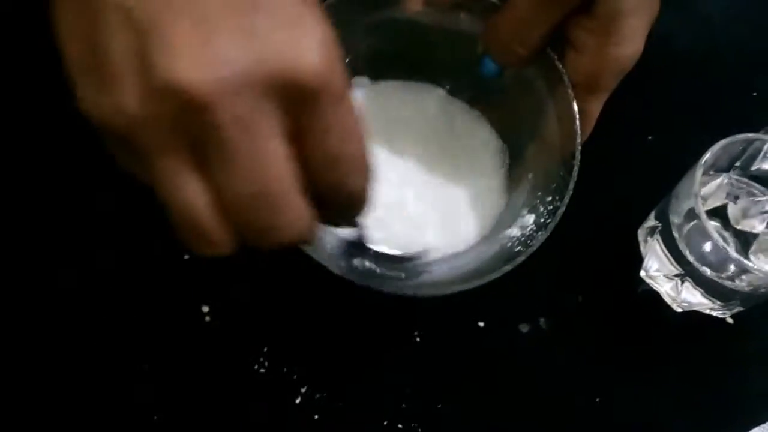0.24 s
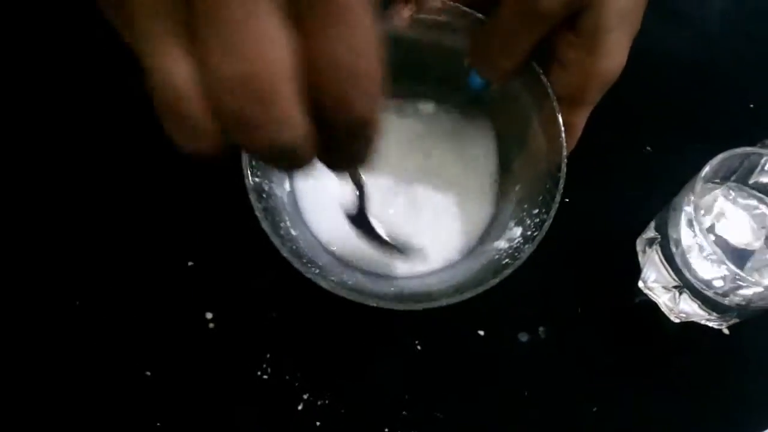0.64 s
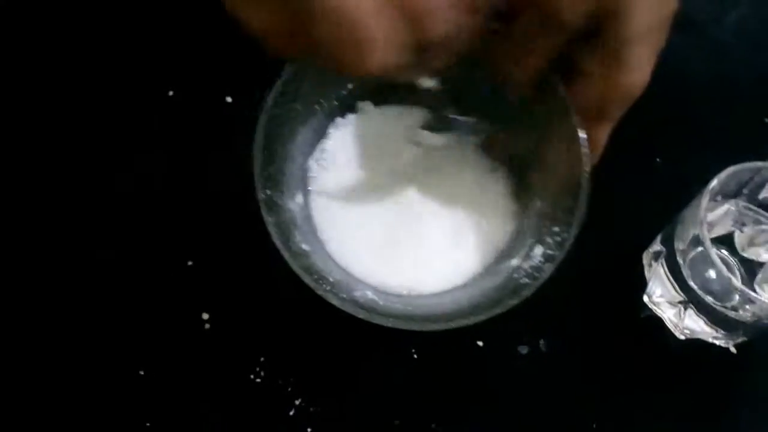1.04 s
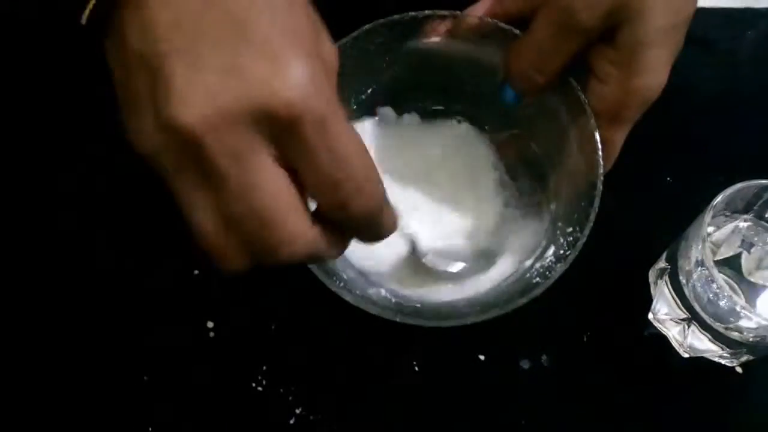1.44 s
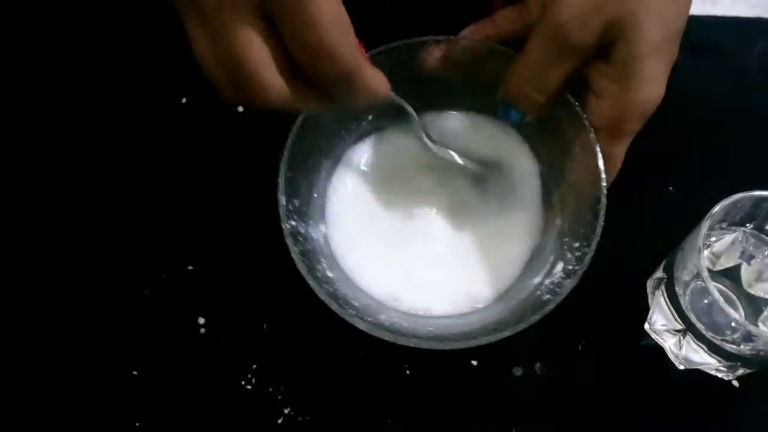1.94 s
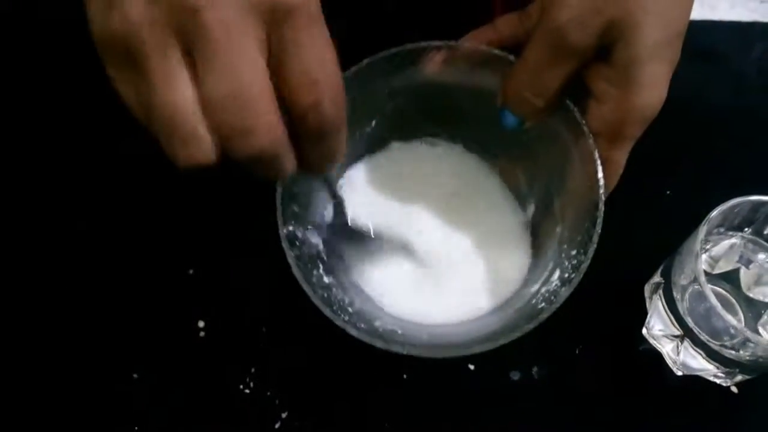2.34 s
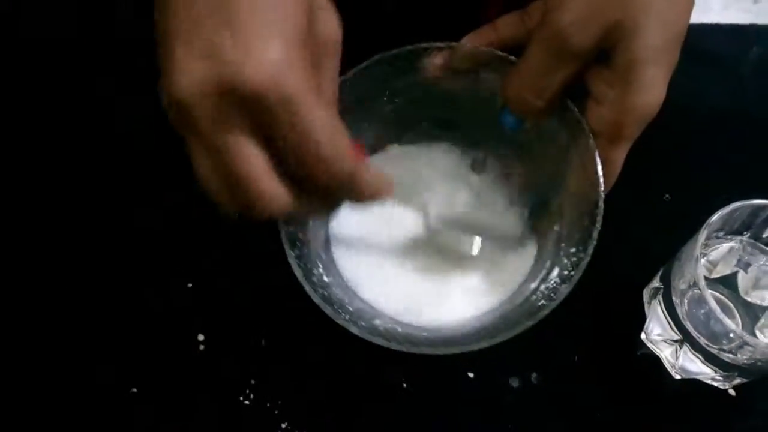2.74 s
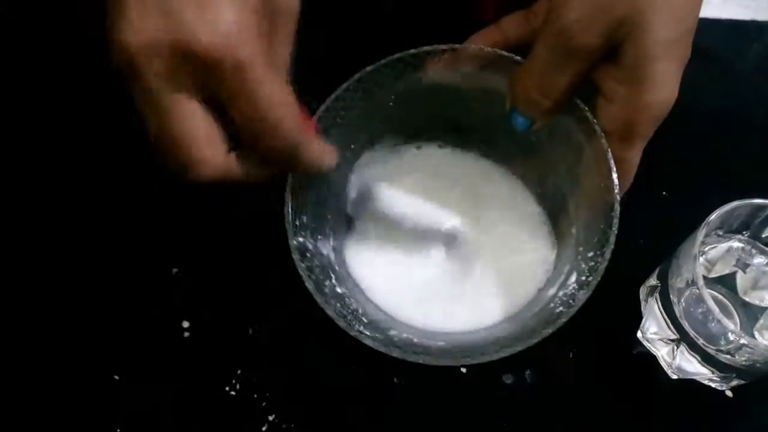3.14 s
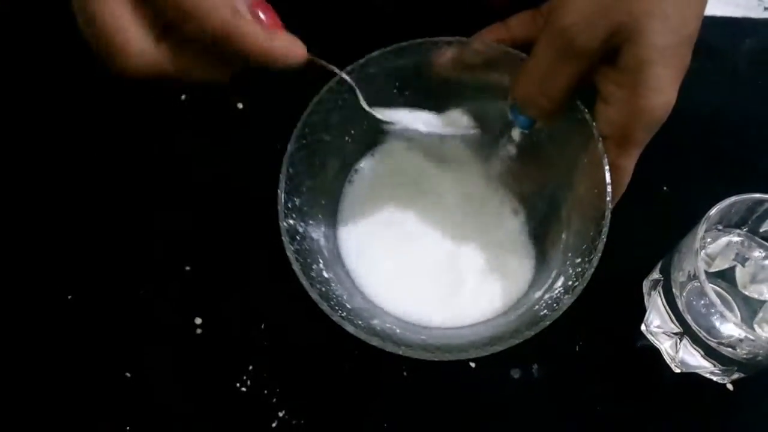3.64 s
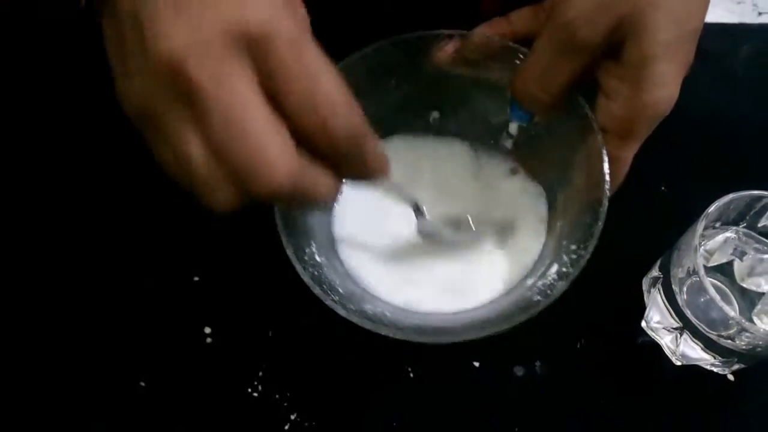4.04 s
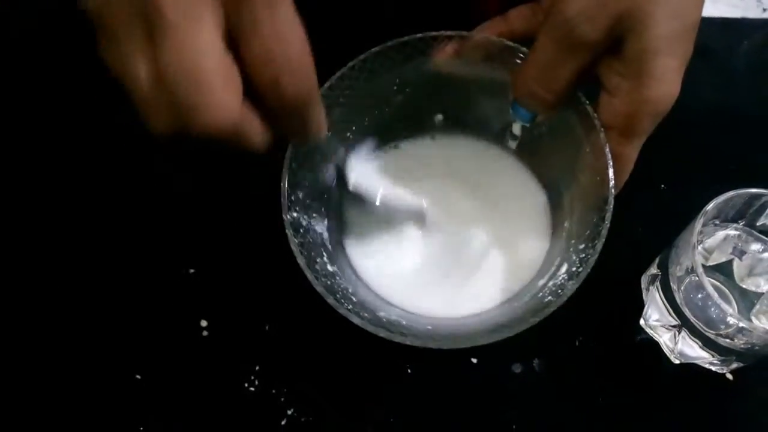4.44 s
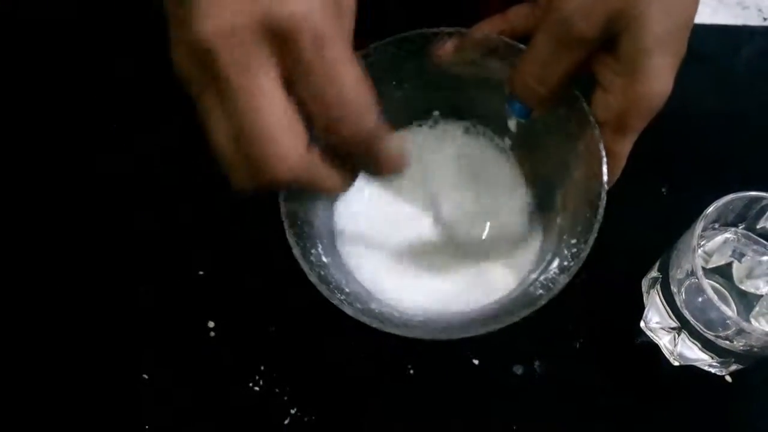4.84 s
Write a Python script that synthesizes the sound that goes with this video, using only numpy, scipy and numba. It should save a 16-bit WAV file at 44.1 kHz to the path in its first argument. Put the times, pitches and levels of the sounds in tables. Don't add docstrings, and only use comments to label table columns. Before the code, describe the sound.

In a small kitchen, a metal spoon stirs thin liquid in a hand-held glass bowl with short, stuttering scrapes and damped knocks. Three hard, bright clinks stand out in the first half. After a small rising squeak and a knock, stirring pauses, tiny drops plink, then scraping resumes. One close microphone, sound leaning right, over a steady fan-like hush.

```python
import sys
import numpy as np
from scipy import signal
from scipy.fft import rfft, irfft, next_fast_len
from scipy.io import wavfile
from numba import njit

SR = 44100
rng = np.random.default_rng(int(sys.argv[2]) if len(sys.argv) > 2 else 0)


def dump_mix(stems):
    frames = np.atleast_2d(stems).T
    limited = np.clip(frames, -1, 1)
    pcm = np.round(limited * 32767).astype(np.int16)
    wavfile.write(sys.argv[1], SR, pcm)


def decibels_to_gain(level_db):
    exponent = np.asarray(level_db, float) / 20
    return 10 ** exponent


N = 224763

# f/Hz, level/dB, t60/s
BASE = [(940, -76, 0.075), (960, -10, 0.034), (1132, -16, 0.028), (1250, -12, 0.035), (593, 2, 0.0059)]
SPOON = [(2740, -15, 0.009), (3330, 5.5, 0.045), (3626, 5, 0.017), (4185, 6.5, 0.011), (4440, -4.5, 0.031),
         (4747, 7, 0.019), (4970, -12, 0.032)]
RIM = [(6490, -9, 0.025), (8070, -22, 0.015), (11800, -33, 0.015)]
WALL = [(1850, -41.5, 0.0074), (2080, -29.5, 0.093), (2380, -26, 0.06), (2544, -24.5, 0.049)]


def rms_one(x):
    return x / np.sqrt(np.mean(x ** 2) + 1e-20)


def at_hz(points, hz):
    points_hz, values = np.transpose(points)
    return np.interp(np.log(hz), np.log(points_hz), values)


def in_time(rows):
    s, *columns = np.transpose(rows)
    return [np.interp(np.arange(N) / SR, s, column) for column in columns]


def drift(rate_hz):
    knots = rng.standard_normal(1200)
    return np.interp(np.arange(N) * rate_hz / SR, np.arange(1200), knots)


def band(x, low_hz, high_hz):
    sos = signal.butter(3, [low_hz, high_hz], "band", fs=SR, output="sos")
    return signal.sosfilt(sos, x)


@njit
def glide(force, turn, r):
    out, state = np.zeros(len(force)), 0j
    for i in range(len(force)):
        state = state * r * turn[i] + force[i]
        out[i] = state.imag
    return out


def ring(force, hz, t60_s):
    turn = np.exp(2j * np.pi * hz / SR) * np.ones(len(force))
    return glide(force, turn, float(decibels_to_gain(-60 / (max(t60_s, 0.002) * SR))))


def scrape():
    # t/s, wall f/Hz, base f/Hz
    contact = [(0.1, 2230, 1090), (0.52, 2240, 1293), (0.8, 2470, 1110), (1.02, 2750, 1100),
               (1.23, 2190, 920), (1.53, 2320, 990), (1.7, 2400, 1100), (1.77, 2080, 1180),
               (1.92, 2340, 1190), (2.22, 2600, 1360), (2.31, 2310, 1350), (2.45, 2380, 1040),
               (2.58, 2680, 1100), (2.95, 2380, 1100), (3.22, 2100, 1225), (4.1, 2250, 1115),
               (4.5, 2210, 1100), (4.85, 2210, 1185)]
    # t/s, level/dB
    rim_song = [(0.81, -58), (0.84, -52), (0.972, -57), (0.994, -48.5), (1.08, -73)]
    # t/s, f/Hz, level/dB
    squeak = [(3.09, 6100, -75), (3.13, 6650, -57), (3.165, 7540, -58), (3.19, 7950, -59),
              (3.24, 8640, -53), (3.27, 8800, -78)]
    spoon_free_hz, spoon_sag_hz_per_db = 4563, 13
    base_db, wall_db, spoon_db = pressure()
    wall_hz, base_hz = in_time(contact)
    spoon_hz = spoon_free_hz - spoon_sag_hz_per_db * np.maximum(spoon_db + 45.5, 0)
    grit_db = -56 + 1.51 * (spoon_db + 29)

    clumps_db = 2.8 * drift(90) + 1.0 * drift(35)
    force = slips(900, spread_db=3.5) * decibels_to_gain(clumps_db)
    wall = rms_one(ring(force, wall_hz, 0.018)) + 0.63 * rubbed(WALL, force, detune=0.034)
    spoon = 0.5 * rms_one(ring(force, spoon_hz, 0.022)) + rubbed(SPOON, force, detune=0.043)
    wet = force + rng.standard_normal(N)
    base = rms_one(ring(wet, base_hz, 0.014)) + 0.8 * rubbed(BASE, wet, detune=0.019)
    grit = rms_one(band(force, 5300, 10500)) + 0.4 * rubbed(RIM, force, detune=0.004)

    out = decibels_to_gain(wall_db - 4.0) * band(wall, 1654, 3300)
    out += decibels_to_gain(base_db - 4.5) * band(base, 787, 1590)
    out += decibels_to_gain(spoon_db - 7.0) * band(spoon, 1790, 4870)
    out += decibels_to_gain(grit_db) * band(grit, 5300, 13000)

    song_db, = in_time([(0.8, -99), *rim_song, (1.1, -99)])
    song = rms_one(ring(force, RIM[0][0], 0.017))
    out += decibels_to_gain(song_db) * band(song, 4400, 7700)
    squeak_hz, squeak_db = in_time(squeak)
    squeal = rms_one(ring(force, squeak_hz, 0.013))
    return out + decibels_to_gain(squeak_db) * band(squeal, 5900, 10000)


def pressure():
    # full pressure t/s, hold/s, pressure/dB, base re wall/dB, spoon re wall/dB
    sweeps = [
        (0.5052, 0.024, -26.5, 4, 4),
        (1.728, 0.18, -29.5, -6, -2.5),
        (2.29, 0.042, -33, -12, -9),
        (2.355, 0.032, -34.5, -18, 0),
        (3.09, 0.058, -38, -4.5, 6.5),
        (3.235, 0.039, -28, 1, 0),
        (2.2, .01, -45, 2, -6),
        (4.47, 0.086, -24.5, -10.5, -4),
        (4.39, 0.047, -42.5, -7.5, 4.5),
        (4.84, 0.029, -40.5, 5.5, 2),
    ]
    skids = [(.096, 0.0082, -28, -17, -15), (.345, 0.036, -43, 0, 1), (.8, 0.004, -26.5, -17, -9),
             (.84, 0.12, -38, -18, 0.5), (.98, 0.038, -35.5, -16, 0.5), (1.23, .01, -26.5, -2, -1),
             (1.29, 0.15, -38.5, -1, 2.5), (1.425, 0.0087, -27, -11, 0), (1.48, 0.093, -43.5, -17, 0),
             (1.665, .04, -47.5, 5.5, 8.5), (2.225, 0.02, -30, -6, -17), (2.4, .17, -30, -9.5, 0),
             (2.76, 0.092, -45.5, -6.5, -1), (2.93, 0.023, -39.5, -16, -14), (3.02, .04, -52, -8, 4),
             (3.15, 0.047, -36.5, -11, 2.5), (3.89, 0.027, -39.5, -26, -19), (4.055, 0.069, -43, 6.5, -0.5),
             (4.15, 0.013, -42, 1, 0), (4.22, .08, -48.5, -9, 0), (4.6, .04, -26.5, -5, -2.5),
             (4.81, 0.052, -53, 16.5, -7), (4.9, 0.1, -45, -7, -7.5)]
    lift_db_per_s = [
        [266],
        [255],
        [403],
    ]
    lean_db_per_s, land_db_per_s = 276, 1502
    slosh_db, slosh_db_per_s = -12.5, 85
    t = np.arange(0, N + 32, 32) / SR
    power = 1e-9
    for rows, rise_db_per_s in ((sweeps, lean_db_per_s), (skids, land_db_per_s)):
        for s, hold_s, db, base_db, spoon_db in rows:
            after_s = np.maximum(t - s - hold_s, 0)
            lift_db = -np.array(lift_db_per_s) * after_s
            fall_db = np.maximum(lift_db, slosh_db - slosh_db_per_s * after_s)
            shape_db = db - rise_db_per_s * np.maximum(s - t, 0) + fall_db
            power = power + decibels_to_gain(2 * (shape_db + np.array([[base_db], [0], [spoon_db]])))
    return [np.interp(np.arange(N) / SR, t, 10 * np.log10(p)) for p in power]


def slips(per_s, spread_db):
    sizes = decibels_to_gain(spread_db * np.minimum(rng.exponential(1, N), 4)) * rng.choice([-1, 1], N)
    born = rng.random(N) < per_s / SR
    return rms_one(sizes * born) + 0.5 * rng.standard_normal(N)


def rubbed(modes, force, detune):
    out = 0
    for hz, db, t60_s in modes:
        favour = decibels_to_gain(db + 4 * drift(45))
        moving_hz = hz * (1 + detune * drift(8.8))
        out = out + ring(force * favour, moving_hz, t60_s) / np.sqrt(t60_s)
    return rms_one(out)


def catches():
    # t/s, peak level/dB, strongest f/Hz, length/s
    grips = [(0.357, -33, 3530, 0.02), (0.478, -22, 2280, 0.011), (0.491, -20.5, 4240, 0.0063),
             (0.508, -16, 4630, 0.0031), (1.247, -22, 2080, 0.002), (1.36, -26.5, 4660, 0.0088),
             (1.427, -19.5, 4490, 0.014), (1.452, -23.5, 2160, 0.0086), (1.7, -28, 2560, 0.0049),
             (1.725, -16.5, 2060, 0.0018), (1.767, -12.5, 2040, 0.0073), (1.8, -20, 4070, 0.0076),
             (1.86, -20, 3400, 0.012), (1.905, -23, 3440, 0.0031), (2.298, -20.5, 2320, 0.0084),
             (1.232, -24, 3030, 0.0044), (2.447, -14.5, 4360, 0.016), (2.534, -18, 3500, 0.003),
             (2.553, -23, 2770, .002), (2.947, -31.5, 2340, .0098), (3.142, -32, 2240, 0.0053),
             (3.187, -20, 2080, 0.0068), (3.242, -14.5, 3510, 0.0096), (4.105, -28.5, 4440, 0.0071),
             (4.116, -27.5, 3330, 0.0057), (4.519, -18, 2330, 0.017), (4.462, -22, 2180, 0.01),
             (4.48, -18.5, 3010, 0.02), (4.536, -22, 2380, 0.0028), (4.57, -22, 4400, .0078)]
    # t/s, peak level/dB, strongest f/Hz, base re peak/dB
    nudges = [(.529, -23, 4740, 2), (0.969, -30.5, 2720, -16), (1.817, -25, 3400, -14),
              (1.925, -26.5, 2380, 5), (2.907, -34, 2420, -8), (3.083, -30, 3360, -19),
              (3.102, -33, 2270, -12), (3.166, -31, 2320, -18), (4.055, -35, 2050, 16),
              (4.153, -31.5, 4800, 7), (4.166, -34, 4800, 4), (4.28, -35.5, 4900, -6),
              (4.409, -33, 2420, -12), (4.812, -36.5, 2350, 20), (4.84, -30.5, 4750, 9)]
    bright_db, nudge_s = -30, 0.005

    def judder(t, noise, length_s):
        return noise * t / length_s * np.exp(-3 * t / length_s), 0.016

    base_db, wall_db, _ = pressure()
    share_db = base_db - wall_db + 4
    rows = [(s, db, hz, share_db[round(s * SR)], bright_db, length_s) for s, db, hz, length_s in grips]
    rows += [(*row, bright_db, nudge_s) for row in nudges]
    return struck(rows, judder, others_db=-18.5, base_db_up=-10.5, bright_db_up=3.0)


def knocks():
    # t/s, peak level/dB, strongest f/Hz, base re peak/dB, brightness re peak/dB
    blows = [(0.1, -28.5, 2170, -4, -55), (0.439, -22.5, 2260, -36, -33), (1.521, -30.5, 2420, -25, -28),
             (1.667, -31, 3140, 14, -35), (1.978, -36.5, 1850, 19, -22), (2.236, -23, 2380, 11, -42),
             (2.487, -19.5, 3330, -4, -55), (2.759, -31, 3330, -20, -29), (3.322, -20, 3100, 5, -11),
             (2.221, -34, 2600, -14, -45), (3.886, -25.5, 3150, 4, -21), (4.622, -15, 2740, -12, -20),
             (4.44, -31, 2150, 0, -20)]
    t60_s = 0.0074

    def blow(t, noise, decay_s):
        return (t == 0) + 0.16 * noise * np.exp(-t / 0.0016), decay_s

    rows = [(*row, t60_s) for row in blows]
    return struck(rows, blow, others_db=-14.5, base_db_up=-9.5, bright_db_up=4.5)


def struck(rows, contact, others_db, base_db_up, bright_db_up):
    size = 4096
    out, t = np.zeros(N + size), np.arange(size) / SR
    luck = rng.standard_normal((len(rows), 20))
    rough = rng.standard_normal((len(rows), size))
    base_from = len(WALL + SPOON)
    rim_from = base_from + len(BASE)
    for (s, db, hz, base_db, bright_db, last_s), draws, noise in zip(rows, luck, rough):
        push, t60_s = contact(t, noise, last_s)
        body = ring(push, hz, t60_s)
        peak = np.abs(body).max()
        body = body / peak
        push = push / peak
        rings = []
        for (f, level_db, ring_s), draw in zip(WALL + SPOON + BASE + RIM, draws):
            rings.append(decibels_to_gain(level_db + 3.4 * draw) * ring(push, f, ring_s))
        others = sum(rings[:base_from])
        base = sum(rings[base_from:rim_from])
        crack = sum(rings[rim_from:]) + 3.0 * push
        hit = band(body + decibels_to_gain(others_db) * others + 0.55 * push, 1840, 4750)
        hit += decibels_to_gain(base_db + base_db_up) * band(base, 748, 1630)
        hit += decibels_to_gain(bright_db + bright_db_up) * band(crack, 5500, 16000)
        at = round(s * SR)
        out[at:at + size] += decibels_to_gain(db) * hit
    return out[:N]


def clinks():
    # t/s, peak level/dB, crack/dB, thud/dB
    hits = [
        (0.7905, -3, -8, -42),
        (1.2181, 2, -14, -33.5),
        (2.3897, -8, -30, -60),
    ]
    # f/Hz, level/dB, t60/s
    hit_modes = [
        [(2525, 0, 0.029), (2680, -10, 0.027), (2855, -8.5, 0.047), (3760, -4.5, 0.012), (4190, -21, 0.062),
         (4440, -3.5, 0.02), (5320, -9, 0.015), (6430, -9, 0.037), (10600, -50, 0.026)],
        [(878, -16, 0.03), (1880, -11, 0.015), (1120, -20, 0.016), (2350, -36, 0.03), (2615, 0, 0.014),
         (3067, 2.5, 0.013), (4800, -3, 0.009), (8200, -19, 0.0045)],
        [(1920, -26, 0.012), (2750, -12, 0.026), (3330, 3, 0.026), (4100, -5, 0.019), (4660, -2, 0.021),
         (6440, -14, .035), (11170, -25, 0.025)],
    ]
    out, t = np.zeros(N), np.arange(8192) / SR
    click = 1.0 * (t == 0)
    for (s, db, crack_db, thud_db), modes in zip(hits, hit_modes):
        push = click + 0.08 * rng.standard_normal(len(t)) * np.exp(-t / 0.002)
        tones = 0
        for k, (hz, level_db, t60_s) in enumerate(modes):
            tones = tones + (-1) ** k * decibels_to_gain(level_db) * ring(push, hz, t60_s)
        hit = band(tones, 650, 17000)
        hit *= 1 - np.exp(-t / 0.0004)
        crack = rng.standard_normal(len(t)) * np.exp(-t / 0.0017)
        hit += decibels_to_gain(crack_db) * band(crack, 5000, 13500)
        blur = rng.standard_normal(len(t)) * np.exp(-t / 0.0023)
        hit += decibels_to_gain(-5.5) * band(blur, 770, 6300)
        thud = ring(click, 216, 0.012) + decibels_to_gain(-19) * ring(click, 56, 0.035)
        hit += decibels_to_gain(thud_db) * thud
        at = round(s * SR)
        out[at:at + len(t)] += decibels_to_gain(db - 2.5) * hit
    return out


def drops():
    # t/s, peak level/dB, start f/Hz, end f/Hz, t60/s
    bubbles = [
        (3.741, -38.5, 2500, 3350, 0.022),
        (3.742, -37.5, 4200, 4400, 0.017),
        (3.794, -41.5, 1160, 1180, 0.048),
        (3.813, -35.5, 3050, 4400, 0.019),
        (.345, -45, 2900, 3900, 0.061),
        (3.792, -29, 4000, 13200, 0.0094),
        (4.478, -23.5, 2500, 3900, 0.039),
        (4.493, -18.5, 3940, 4130, 0.017),
        (4.512, -20.5, 4300, 4700, 0.031),
        (3.183, -21, 3060, 4600, 0.019),
    ]
    out, t = np.zeros(N), np.arange(4096) / SR
    for s, db, start_hz, end_hz, t60_s in bubbles:
        hz = end_hz + (start_hz - end_hz) * np.exp(-t / (0.18 * t60_s))
        shape = (1 - np.exp(-t / 0.00096)) * decibels_to_gain(-60 * t / t60_s)
        at = round(s * SR)
        out[at:at + len(t)] += decibels_to_gain(db + 7) * shape * np.sin(2 * np.pi * np.cumsum(hz) / SR)
    return out


def kitchen(x):
    # f/Hz, t60/s
    decay = [(200, 1), (1000, 0.3), (3000, 0.22), (8000, 0.21), (16000, 0.33)]
    t, tail = np.arange(SR // 2) / SR, 0
    edges_hz = 150 * 2 ** np.arange(0, 7, 0.5)
    for low_hz, high_hz in zip(edges_hz, edges_hz[1:]):
        sos = signal.butter(2, [low_hz, high_hz], "band", fs=SR, output="sos")
        echoes = signal.sosfilt(sos, rng.standard_normal(len(t)))
        tail = tail + echoes * decibels_to_gain(-60 * t / at_hz(decay, np.sqrt(low_hz * high_hz)))
    tail = tail * np.clip((t - 0.004) / 0.0023, 0, 1)
    return signal.fftconvolve(x, tail / np.sqrt(np.sum(tail ** 2)))[:N]


def hush():
    # f/Hz, density level/dB per Hz
    spectrum = [(24, -64), (40, -38), (81, -25), (228, -10), (427, -9.5), (673, -3), (802, -9), (1200, -6),
                (1430, -5), (2250, 0.5), (3920, -11), (4800, -11), (6020, -18.5), (14900, -24), (16500, -5)]
    level_db = -43
    flutter = decibels_to_gain(0.6 * drift(6))
    size = next_fast_len(N)
    hz = np.maximum(np.arange(size // 2 + 1) * SR / size, 1)
    shaped = rfft(rng.standard_normal(size)) * decibels_to_gain(at_hz(spectrum, hz))
    return decibels_to_gain(level_db) * flutter * rms_one(irfft(shaped, size)[:N])


def scene():
    kitchen_db = -13
    bowl = scrape() + knocks() + clinks() + catches() + drops()
    heard = bowl + decibels_to_gain(kitchen_db) * kitchen(bowl) + hush()
    return np.array([heard, heard])


def low_pass(x):
    return signal.sosfilt(signal.butter(12, 16650, fs=SR, output="sos"), x)


def record(dry):
    ceiling, left_re_right_db, cutoff_hz = 0.61, -5.5, 16700
    clipped = dry / (1 + np.abs(dry / ceiling) ** 6) ** (1 / 6)
    low = signal.butter(2, 500, fs=SR, output="sos")
    clipped = clipped - 0.8 * signal.sosfiltfilt(low, clipped - dry)
    panned = clipped * decibels_to_gain(np.array([[left_re_right_db / 2], [-left_re_right_db / 2]]))
    top = signal.cheby2(10, 60, cutoff_hz, fs=SR, output="sos")
    return low_pass(signal.sosfilt(top, panned))


dry = scene()
out = record(dry)
dump_mix(out)
```